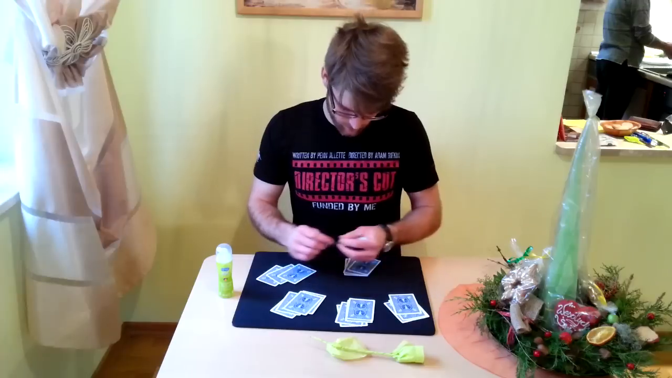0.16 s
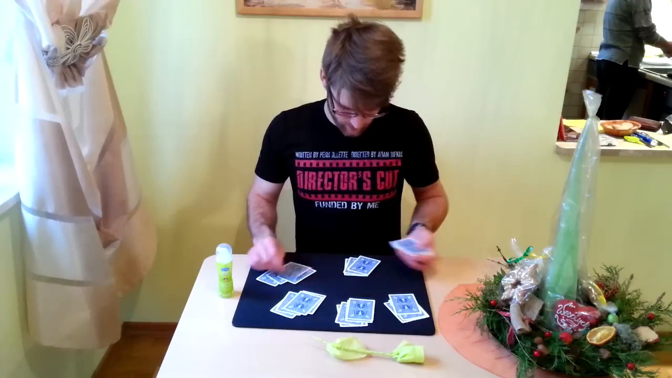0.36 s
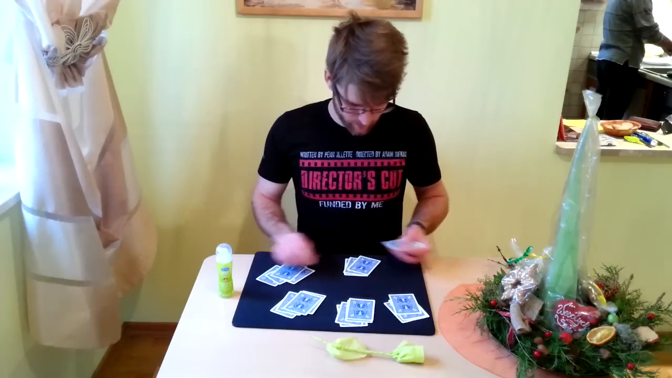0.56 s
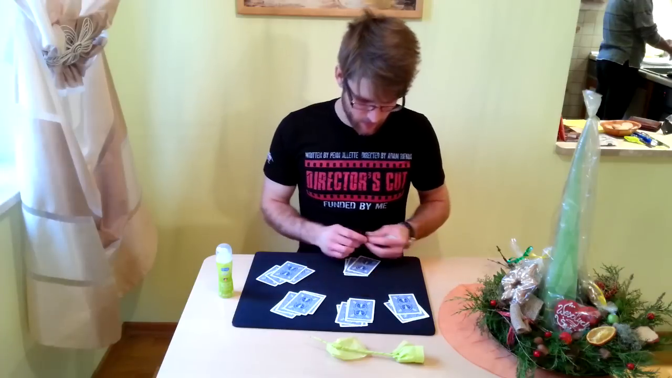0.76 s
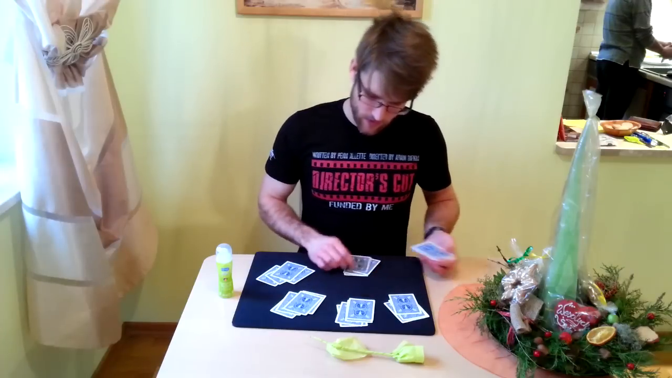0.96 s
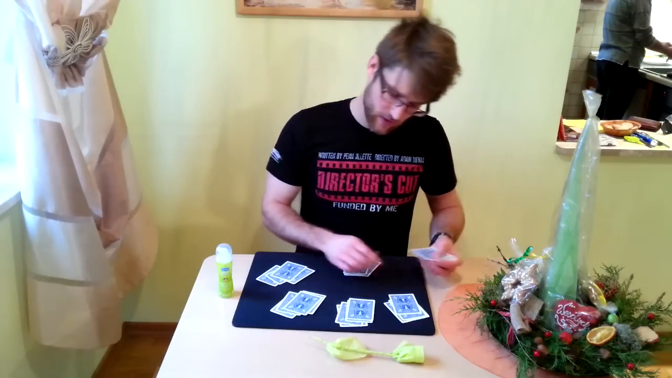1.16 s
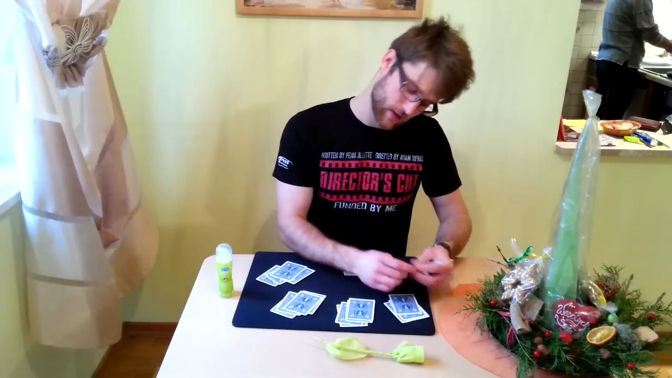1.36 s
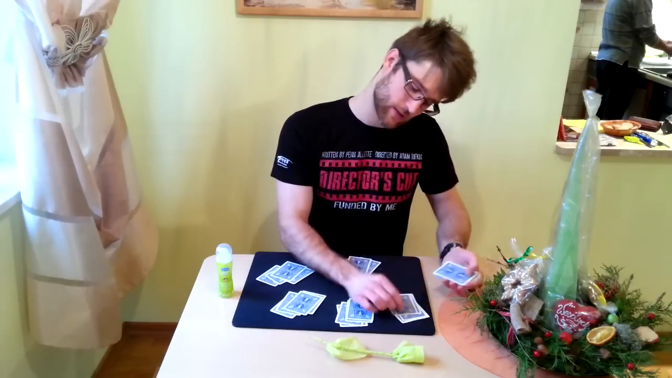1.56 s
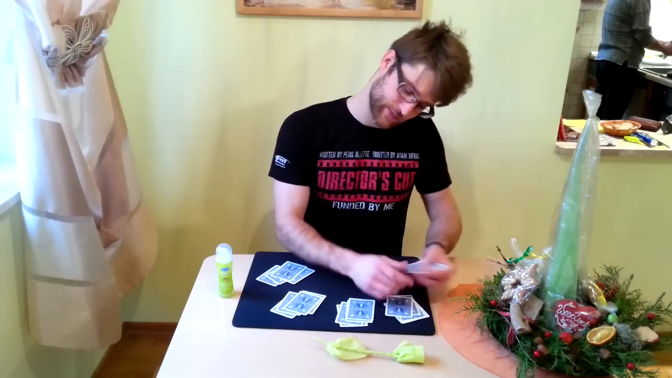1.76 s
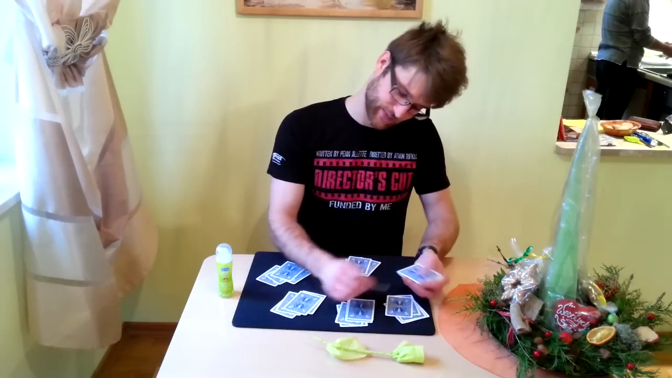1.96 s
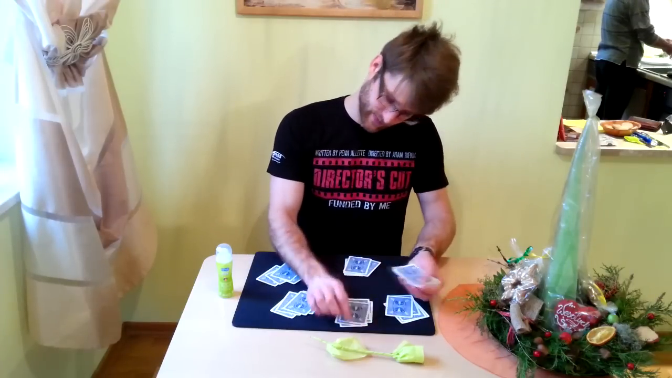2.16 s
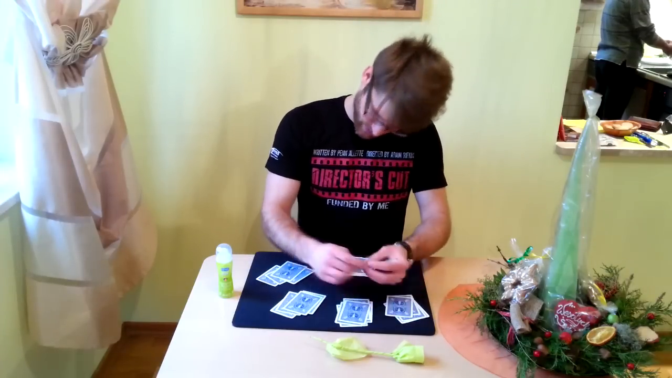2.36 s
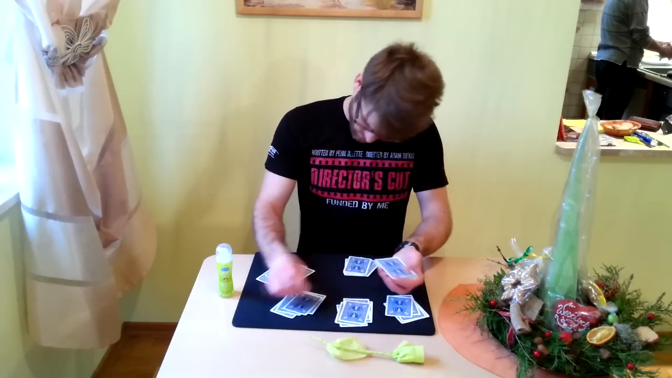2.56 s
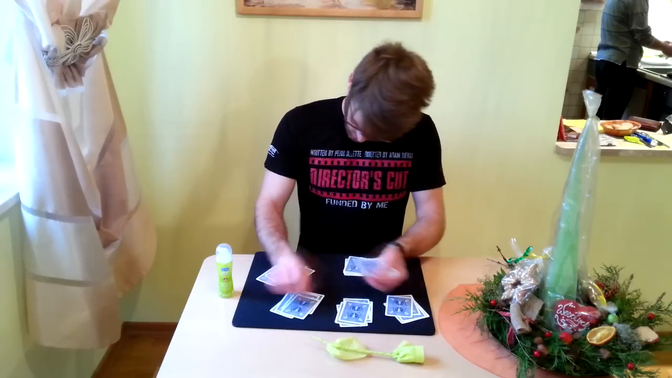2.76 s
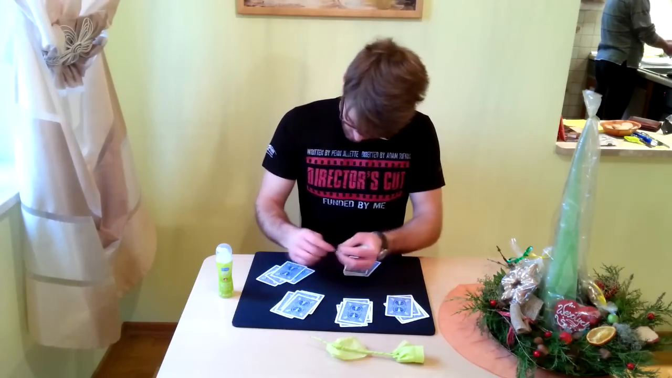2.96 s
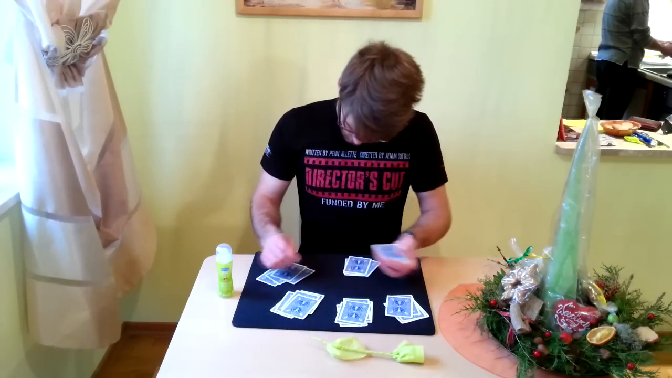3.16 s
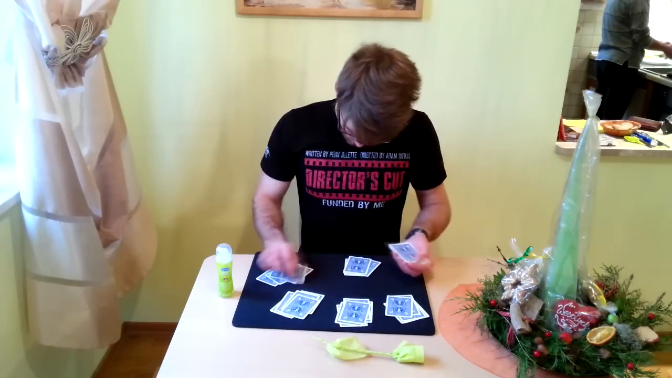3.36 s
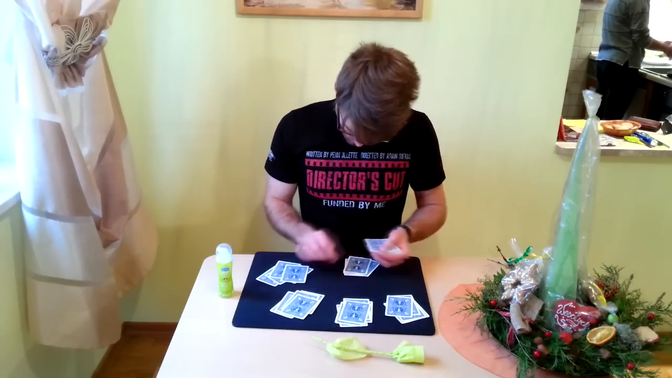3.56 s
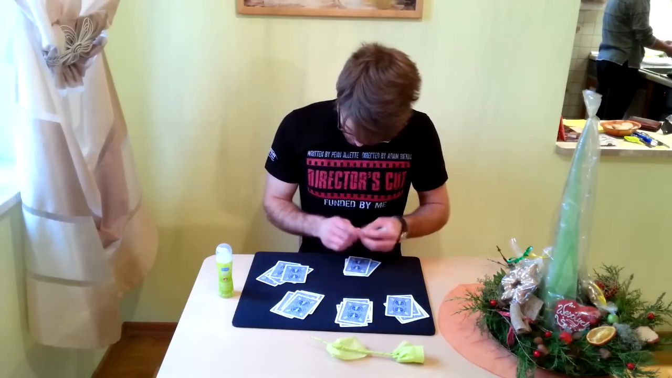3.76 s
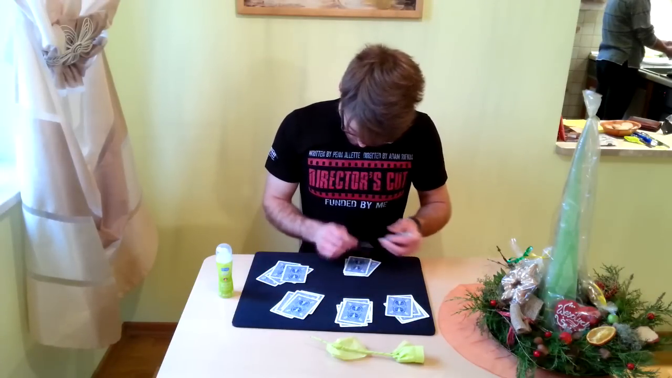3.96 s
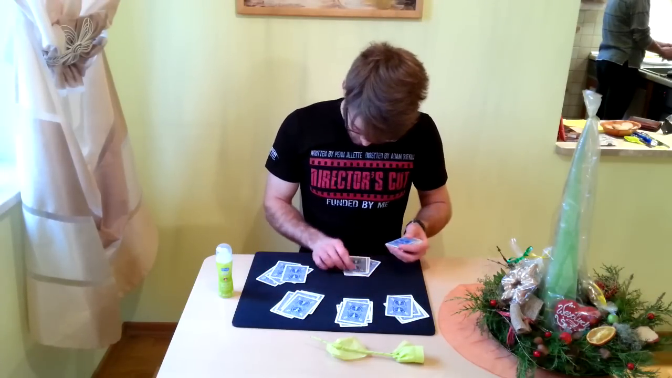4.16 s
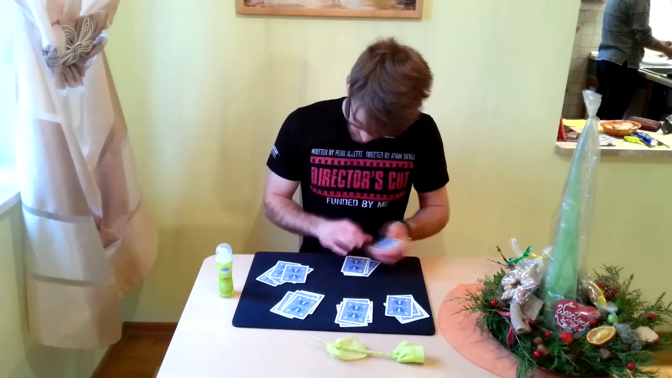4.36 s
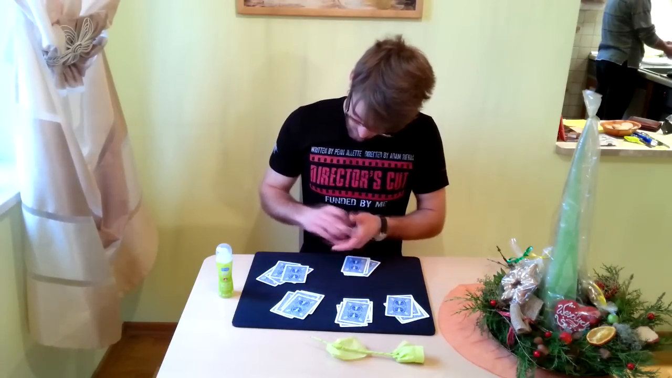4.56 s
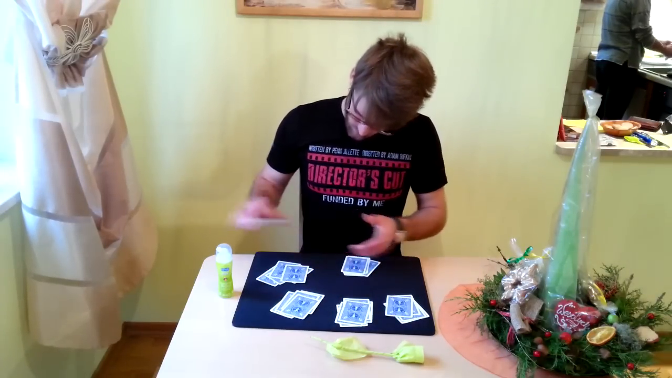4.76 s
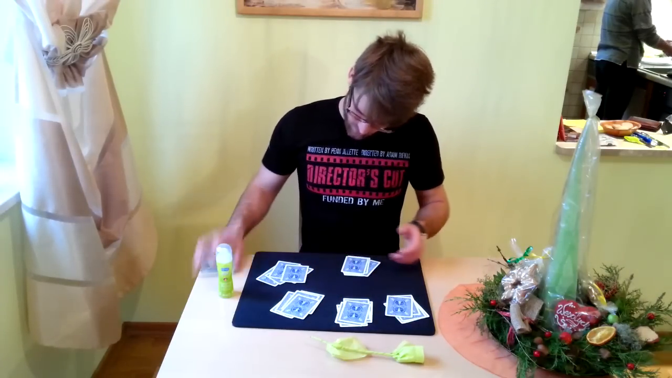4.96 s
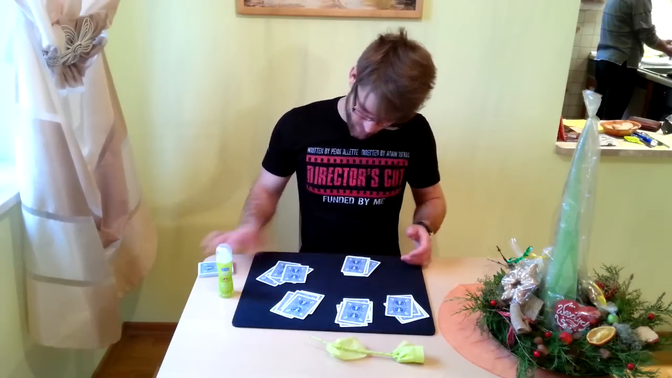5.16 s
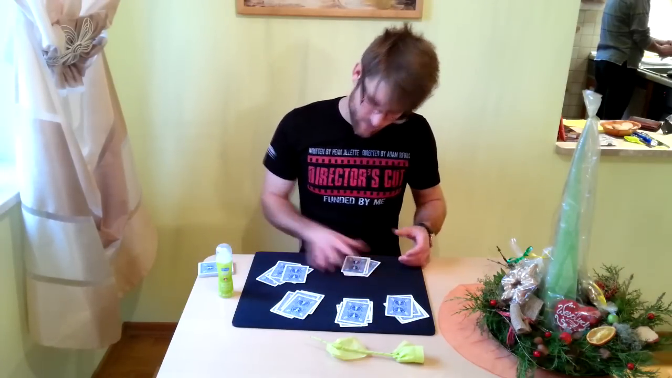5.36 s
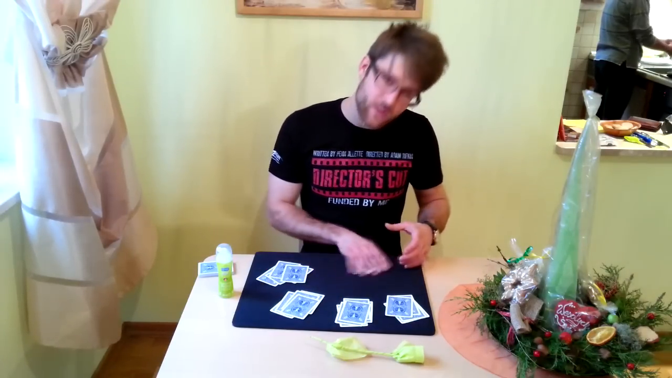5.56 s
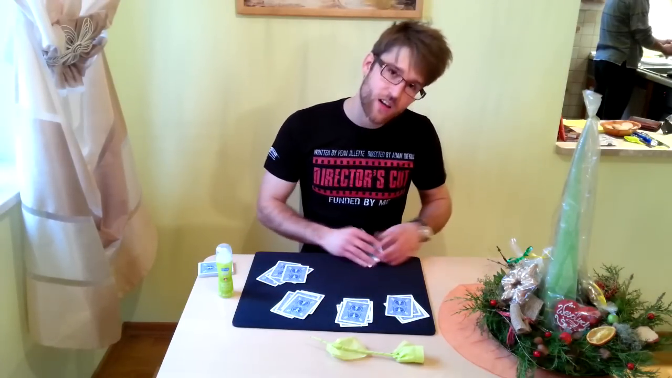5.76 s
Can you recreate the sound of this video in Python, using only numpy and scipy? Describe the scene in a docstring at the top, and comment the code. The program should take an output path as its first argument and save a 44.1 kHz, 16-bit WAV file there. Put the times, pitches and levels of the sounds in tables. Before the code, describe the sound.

A person deals playing cards onto a soft mat in a bare, lively room, heard in stereo from a short distance. Faint hiss, a wavering low rumble and a very thin hum lie beneath. A soft snap comes at 0.5 s, then crisper ones at about 1.1, 1.7 and 2.2 s, each a short papery crack with a small damped thud and a quick room tail. A duller snap with a longer skid follows at 2.7 s, a weak scuffing one at 3.5 s, and a firm, sharper slap at 4.3 s. Between them are quiet grainy slides, tiny edge ticks and soft finger touches. Light flicks and rubbing fill the pause around 4.6 s. At 5.06 s the pack hits the hard table: a tight cluster of contacts forming one loud, woody knock with card clatter, ringing briefly. From 5.5 s a soft brushing and a small tick at 5.7 s end it.

```python
"""Dealing playing cards

Cards are dealt one by one onto a soft mat in a bare, lively room: damped resonances and friction bursts
make each snap, shorter ones the edge flicks, and soft resonances the finger touches.
Grainy noise makes the sliding. Near the end the pack is knocked down on the hard table top, whose modes ring.
Faint hiss, wavering rumble and a thin hum lie beneath."""
import sys
import numpy as np
from scipy import signal
from scipy.fft import rfft, irfft
from scipy.io import wavfile

SR = 44100
rng = np.random.default_rng(int(sys.argv[2]) if len(sys.argv) > 2 else 0)


def int16_out(signal):
    """Quantize to a 16-bit WAV file."""
    q = np.round(np.clip(np.atleast_2d(signal).T, -1, 1) * 32767)
    wavfile.write(sys.argv[1], SR, q.astype(np.int16))


N = 255778
TIME = np.arange(N) / SR

# pack meets table, edge first, then card upon card: [t/s, relative level/dB]
KNOCK = [(5.0610, -11), (5.067, 1), (5.0700, -2.5), (5.0757, -6), (5.084, -14)]
# card-on-card friction spectrum: [f/Hz, relative level/dB per Hz]
CARD_HISS = [(1500, -26), (2500, -2), (4000, 0), (6000, -10.5), (10000, -10), (15000, -16)]
# diffuse sound: [f/Hz, left-right correlation]
LIKENESS = [(130, 0.89), (300, 0.92), (550, 0.8), (1000, 0.25), (2000, 0.031), (8000, 0.14)]


def from_db(db):
    """Decibels to gain."""
    return 10 ** (np.asarray(db) / 20)


def unit_energy(x):
    """Scale to the energy of a unit click."""
    return x / np.sqrt(np.sum(x ** 2, axis=-1, keepdims=True) + 1e-20)


def at_hz(points, hz):
    """Read a table on a log-frequency axis."""
    f, value = np.transpose(points)
    return np.interp(np.log(np.maximum(hz, 1)), np.log(f), value)


def bins(size):
    """Frequencies of a real FFT, Hz."""
    return np.arange(size // 2 + 1) * SR / size


def response(spectrum, size=4096):
    """Causal (minimum-phase) click with the given spectrum and unit energy."""
    cepstrum = irfft(np.log(from_db(at_hz(spectrum, bins(size)))))
    # fold the cepstrum onto positive time
    cepstrum[1:size // 2] *= 2
    cepstrum[size // 2 + 1:] = 0
    return unit_energy(irfft(np.exp(rfft(cepstrum))))


def through(x, impulse):
    """Pass a signal through an impulse response."""
    return signal.fftconvolve(np.atleast_2d(x), np.atleast_2d(impulse), axes=-1)[:, :N]


def add(track, s, sound):
    """Mix a sound into a track at time s."""
    at = int(np.clip(round(s * SR), 0, N - 1))
    track[..., at:at + sound.shape[-1]] += sound[..., :N - at]


def ring(hz, cycles, size=4096):
    """Heavily damped resonance with steep skirts that dies in about so many cycles; unit energy."""
    radius = from_db(-60 * hz / (cycles * SR))
    angle = 2 * np.pi * hz / SR
    section = [1, 0, -1, 1, -2 * radius * np.cos(angle), radius * radius]
    return unit_energy(signal.sosfilt([section, section], signal.unit_impulse(size)))


def scuff(decay_s, size=4096):
    """Burst of paper friction: exponentially decaying white noise; unit energy."""
    return unit_energy(rng.standard_normal(size) * np.exp(-TIME[:size] / decay_s))


def diffuse(size, likeness=LIKENESS):
    """Stereo white noise whose two sides are as alike at each frequency as the table says."""
    mid, side = rfft(rng.standard_normal((2, size)))
    alike = np.clip(at_hz(likeness, bins(size)), -1, 1)
    common = np.sqrt((1 + alike) / 2) * mid
    opposed = np.sqrt((1 - alike) / 2) * side * [[1], [-1]]
    return irfft(common + opposed, size)


def lean(x, balance):
    """Split an L-R dB table evenly between left and right."""
    tilt_db = at_hz(balance, bins(N)) / 2
    return irfft(rfft(x) * from_db([tilt_db, -tilt_db]), N)


def room(direct_db, early_db=-3, tail_db=0.0, early_t60=0.3, gap_s=0.0018, size=256):
    """Direct sound, two near echoes, a cloud of early reflections and a tail whose treble dies first."""
    # reverberation: [f/Hz, t60/s]
    tail_t60 = [(150, 1), (500, 0.69), (1500, 0.65), (4000, 0.61), (7000, 0.51), (13000, 0.34)]
    # nearest surfaces: [delay/s, level/dB re direct]
    echoes = [(.0046, -4.5), (.0068, -4)]
    t = TIME[:SR]
    hz, when_s, frames = signal.stft(diffuse(SR), SR, nperseg=size)
    decay = from_db(-60 * when_s / at_hz(tail_t60, hz)[:, None])
    tail = signal.istft(frames * decay, SR)[1][:, :SR]
    early = diffuse(SR) * from_db(-60 * t / early_t60)
    build = 1 - np.exp(-(t / gap_s) ** 2)
    impulse = from_db(tail_db) * unit_energy(tail * build)
    impulse += from_db(early_db) * unit_energy(early * build)
    impulse[:, 0] += from_db(direct_db)
    for delay_s, db in echoes:
        for ear in impulse:
            jitter_s = rng.uniform(-0.0004, 0.00034)
            add(ear, delay_s + jitter_s, from_db([db + direct_db]))
    return impulse


def background(air_db=-57.5, swing_db=1.4, swing_s=.13, rumble_hz=300, hum_hz=252.3, hum_db=-69.5):
    """Steady faint hiss, a low rumble that wavers slowly, and a thin hum."""
    # still room spectrum: [f/Hz, relative level/dB per Hz]
    air_colour = [(15, -72), (25, -7), (44, -9), (75, -10.5), (196, -2), (265, -1), (383, -7.5),
                  (501, -4.5), (558, -8), (1030, -10), (1240, -14.5), (3440, -16.5), (6370, -21.5),
                  (13500, -17.5), (15000, -27.5)]
    # room air: [f/Hz, left-right correlation]
    air_likeness = [(40, -1), (130, 0.55), (300, 0.42), (550, 0.28), (1000, 0.42), (2000, 0.15),
                    (8000, 0.04)]
    air = from_db(air_db) * through(diffuse(N, air_likeness), response(air_colour))
    lowpass = signal.butter(2, rumble_hz, fs=SR, output="sos")
    rumble = signal.sosfiltfilt(lowpass, air)
    smoothing = unit_energy(np.hanning(int(2 * swing_s * SR)))
    slow = signal.fftconvolve(rng.standard_normal(N), smoothing, "same")
    hum = from_db(hum_db) * np.sqrt(2) * np.sin(2 * np.pi * hum_hz * TIME)
    return (air - rumble) + from_db(swing_db * slow) * rumble + hum


def stroke(start_s, length_s, attack_s=0.025, release_s=0.057, sag_db_per_s=5):
    """Friction gain of one stroke: rises, sags as the pressure eases, dies away as the hand comes to rest."""
    t = np.maximum(TIME - start_s, 0)
    attack = np.minimum(t / attack_s, 1)
    sag = from_db(-sag_db_per_s * np.minimum(t, length_s))
    release = np.exp(-np.maximum(t - length_s, 0) / release_s)
    return attack * sag * release


def sliding(hiss_db=-2.5, brush_db=-3, grain_db=1.5, catches_per_s=220):
    """Paper fibres catch and let go, so the friction noise is grainy; the room spreads it wide."""
    # hand draws a card off the pack or pushes it onto its pile:
    # [start/s, length/s, card on card relative level/dB, hand and card on mat relative level/dB]
    strokes = [(-0.05, 0.048, -49, -50.5), (0.215, 0.061, -61, -55.5), (0.385, 0.061, -61, -53.5),
               (0.684, 0.42, -55, -55.5), (1.281, 0.2, -57, -56), (1.44, .21, -55, -53),
               (1.796, .37, -52, -48), (2.37, 0.11, -53.5, -52.5), (2.667, .06, -55.5, -61),
               (2.86, 0.22, -60, -55), (3.011, 0.053, -50, -49), (3.288, 0.23, -61, -64.5),
               (3.856, 0.31, -53.5, -56), (4.556, 0.19, -54.5, -59), (4.93, 0.16, -68, -61),
               (5.526, .09, -53, -52), (5.59, .21, -49, -51.5)]
    # friction on the mat: [f/Hz, relative level/dB per Hz]
    mat_brush = [(120, -21.5), (290, 6.5), (560, 1), (1100, 4.5), (2000, 1), (3500, -3), (8000, -22)]
    hiss, brush = np.zeros((2, N))
    for start_s, length_s, card_db, mat_db in strokes:
        motion = stroke(start_s, length_s)
        hiss = np.maximum(hiss, from_db(card_db + hiss_db) * motion)
        brush = np.maximum(brush, from_db(mat_db + brush_db) * motion)
    # random gain, held from one catch to the next
    catch = np.cumsum(rng.random(N) < catches_per_s / SR)
    grain = from_db(grain_db * rng.standard_normal(N))[catch]
    on_card = grain * hiss * diffuse(N)
    on_mat = grain * brush * diffuse(N)
    return through(on_card, response(CARD_HISS)) + through(on_mat, response(mat_brush))


def fingers(edge_cycles=3.4, tick_db=-10.5, rub_db=-3, grit_db=-8, touch_db=15, touch_cycles=5):
    """A card edge lets go with a tick and scrapes on briefly; fingers touch the mat softly."""
    # card edges flick past each other: [t/s, relative level/dB, f/Hz, scrape decay/s]
    flicks = [(0.702, -27, 1780, 0.0072), (0.766, -23, 3600, 0.005), (0.98, -23, 3030, 0.0018),
              (2.106, -32, 2820, .005), (2.526, -22, 2430, 0.0044), (2.668, -29.5, 2020, 0.0059),
              (3.020, -22, 3440, 0.0035), (3.282, -29.5, 1700, 0.0073), (3.453, -21.5, 2970, 0.013),
              (3.493, -24, 5160, 0.0079), (3.896, -22.5, 3780, 0.014), (4.119, -29.5, 2160, 0.0066),
              (4.559, -25.5, 2480, 0.0055), (4.632, -30, 4200, .012), (4.684, -23, 3670, 0.0066),
              (5.707, -23.5, 4730, 0.0024)]
    # fingers touch the mat: [t/s, relative level/dB, f/Hz]
    touches = [(0.261, -47, 575), (0.386, -43, 584), (0.406, -45, 295), (1.4, -47, 900), (1.595, -41, 476),
               (2.526, -41.5, 1000), (3.02, -43, 1170), (3.47, -38.5, 1020), (4.112, -49.5, 1050)]
    out, hiss = np.zeros((2, N)), response(CARD_HISS)
    for s, db, hz, decay_s in flicks:
        edge = ring(hz, edge_cycles)
        tick = from_db(tick_db) * unit_energy(edge + hiss)
        rub = from_db(rub_db) * through(scuff(decay_s), edge)
        grit = from_db(grit_db) * through(scuff(decay_s), hiss)
        add(out, s, from_db(db) * through(tick, room(direct_db=3.5)))
        add(out, s, from_db(db) * through(rub + grit, room(direct_db=-3.5)))
    for s, db, hz in touches:
        touch = from_db(db + touch_db) * ring(hz, touch_cycles)
        add(out, s, through(touch, room(direct_db=0.0)))
    return out


def table_ring(level_db=-13, swell_s=0.028, right_db=2.0):
    """The table top takes up the hardest blow; its modes swell as they fill the room, and close pairs beat."""
    # table top modes: [f/Hz, relative level/dB, t60/s]
    modes = [(166.8, -6.5, 0.18), (292, -14, 0.61), (391.5, -4.5, 0.24), (447, -15, 0.66),
             (485, -9.5, 0.69), (494.4, 9.5, 0.24), (596, -21, 0.36), (746, -6.5, 0.28), (984, -6, 0.33),
             (1073, -7, 0.18), (1310, -18, 0.65), (1570, -27, 0.93), (1790, -23, .45)]
    out, t = np.zeros((2, N)), TIME[:SR]
    blow_s = KNOCK[1][0]
    swell = 1 - np.exp(-(t / swell_s) ** 2)
    for hz, db, t60 in modes:
        envelope = from_db(db + level_db - 60 * t / t60) * swell
        phase = 2 * np.pi * hz * t
        apart_rad = np.arccos(np.clip(at_hz(LIKENESS, hz), -1, 1))  # phase between the sides
        add(out[0], blow_s, envelope * np.sin(phase))
        add(out[1], blow_s, envelope * np.sin(phase + apart_rad) * from_db(right_db))
    return out


def knock(level_db=13, clatter_db=-6, clatter_s=0.0094, size=4096):
    """Each contact of the pack is a hard clack and a clatter of loose cards, heard mostly via the room."""
    # knock spectrum: [f/Hz, relative level/dB per Hz]
    colour = [(50, -42), (100, -24.5), (160, -13.5), (250, -11.5), (450, 1), (660, -3.5), (960, 3),
              (1250, -4), (1900, -4), (2500, -12.5), (3600, -5), (4350, -3.5), (5500, -16.5), (11000, -24),
              (15000, -48)]
    # left-right balance of the knock by frequency: [f/Hz, L-R level/dB]
    knock_balance = [(250, -1), (500, 2.5), (1000, -1), (2500, 1), (4800, 0), (9000, -2.5), (14000, -22)]
    out = np.zeros((2, N))
    for s, db in KNOCK:
        force = signal.unit_impulse(size) + from_db(clatter_db) * scuff(clatter_s)
        space = room(direct_db=-12.0, early_db=3.5, early_t60=0.13, gap_s=0.00027)
        add(out, s, from_db(db + level_db) * through(force, space))
    return lean(through(out, response(colour)), knock_balance)


def snaps(card_cycles=3.08, overtone_ratio=1.99, overtone_cycles=13, thud_cycles=1.37,
          slip_db=-7, slip_s=0.002, size=4096):
    """The bent card slips off the thumb, springs flat in two bending modes, slaps the pile and skids to rest."""
    # [t/s, card level/dB, card f/Hz, overtone level/dB re card, thud level/dB, thud f/Hz,
    #  crack level/dB, skid level/dB, skid decay/s]
    deals = [(0.49, -16.5, 1290, -20, -20, 630, -16, -20.5, 0.0042),
             (1.0666, -7.5, 1440, -20, -17.5, 480, -14, -10, 0.0098),
             (1.662, -6, 1630, -16, -6.5, 537, -5.5, -11.5, 0.0011),
             (2.1997, -5, 1230, -15, -19.5, 327, -7, -21, 0.0042),
             (2.732, -14, 945, -25, -15.5, 324, -13.5, -9.5, 0.024),
             (3.462, -19, 920, -20, -20, 400, -19, -20, .028),
             (4.2578, -9.5, 1380, -4.5, -4.5, 760, -4, -14.5, 0.0018)]
    # crack spectrum: [f/Hz, relative level/dB per Hz]
    crack_spectrum = [(500, -22.5), (1500, 6), (2300, 0), (3000, 0.5), (4400, -0.5), (6000, -9.5),
                      (8000, -6), (11000, -8), (15000, -15)]
    # skid spectrum: [f/Hz, relative level/dB per Hz]
    skid_spectrum = [(600, -18), (1500, 4), (2700, -1.5), (4300, 4), (6000, -2.5), (8500, -8.5),
                     (15000, -11.5)]
    out, crack_colour = np.zeros((2, N)), response(crack_spectrum)
    for s, card_db, card_hz, overtone_db, thud_db, thud_hz, crack_db, skid_db, skid_s in deals:
        # friction swells until the card lets go
        slip = np.array([scuff(slip_s)[::-1] for ear in out])
        add(out, s - size / SR, from_db(crack_db + slip_db) * through(slip, crack_colour))
        overtone = from_db(overtone_db) * ring(overtone_ratio * card_hz, overtone_cycles)
        card = from_db(card_db) * (ring(card_hz, card_cycles) + overtone)
        thud = from_db(thud_db) * ring(thud_hz, thud_cycles)
        crack = from_db(crack_db) * crack_colour
        skid = from_db(skid_db) * through(scuff(skid_s), response(skid_spectrum))
        # face, mat and edge radiate in different directions, so each meets other walls first
        add(out, s, through(card, room(direct_db=0.2)))
        add(out, s, through(thud, room(direct_db=-5)))
        add(out, s, through(crack, room(direct_db=-8.0)))
        add(out, s, through(skid, room(direct_db=-2.0)))
    return out


def scene():
    """All the handling sounds in one room, over its faint background."""
    return background() + sliding() + fingers() + table_ring() + knock() + snaps()


def record(dry, cutoff_hz=14900):
    """The two microphone ports differ in colour; peaks are rounded and the top is cut."""
    # microphone ports: [f/Hz, L-R level/dB]
    ports = [(200, 0), (500, 0), (1300, -0.5), (2400, 0.5), (3800, 2), (5200, -4.5), (8500, -3.5),
             (14000, -2)]
    rounded = np.tanh(lean(dry, ports))
    lowpass = signal.ellip(12, .1, 90, cutoff_hz, fs=SR, output="sos")
    return signal.sosfilt(lowpass, rounded)


dry = scene()
out = record(dry)
int16_out(out)
```